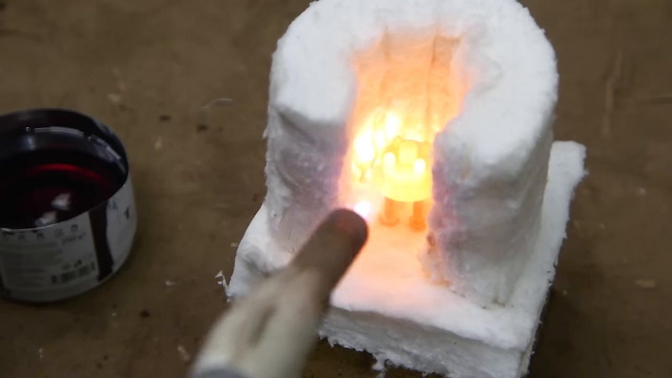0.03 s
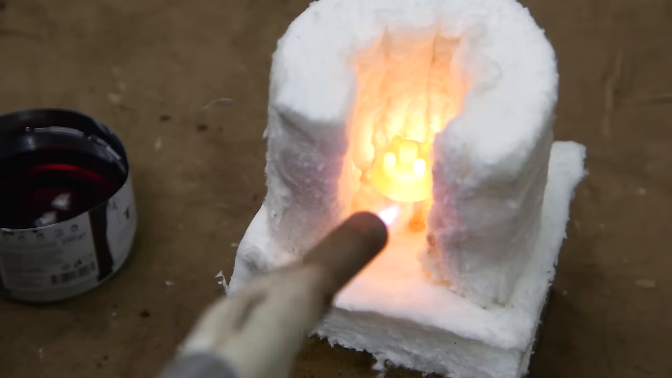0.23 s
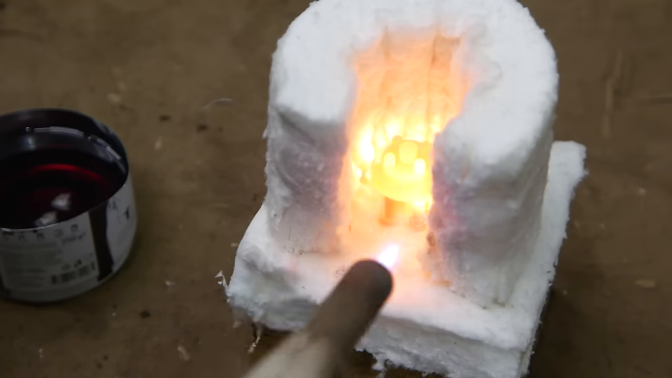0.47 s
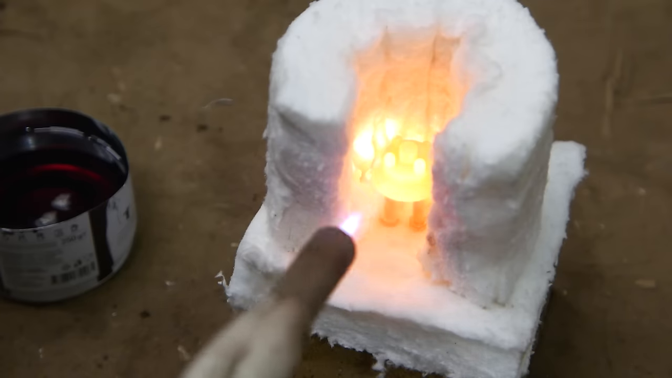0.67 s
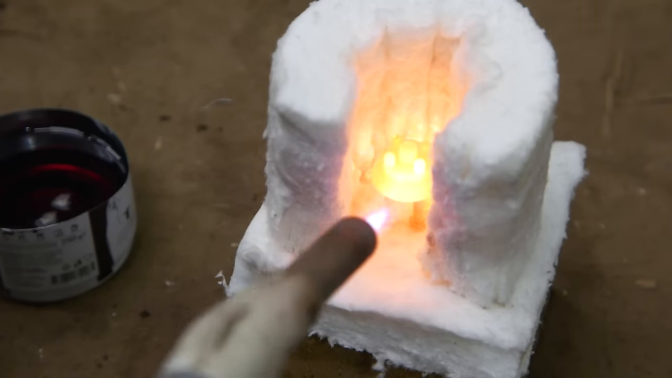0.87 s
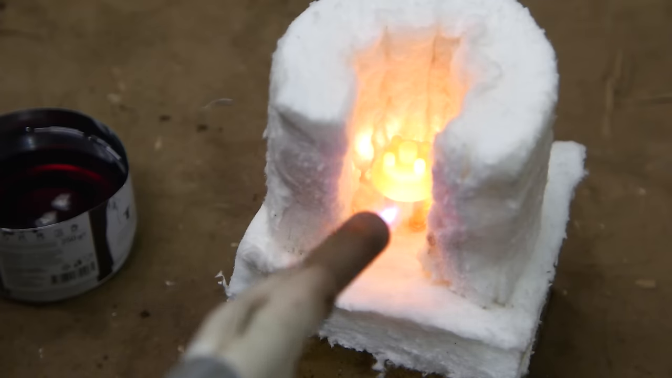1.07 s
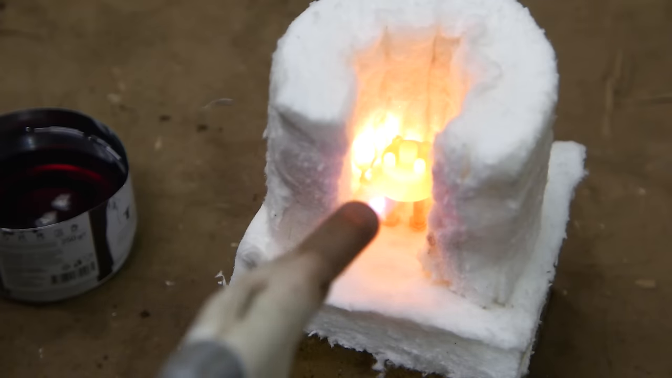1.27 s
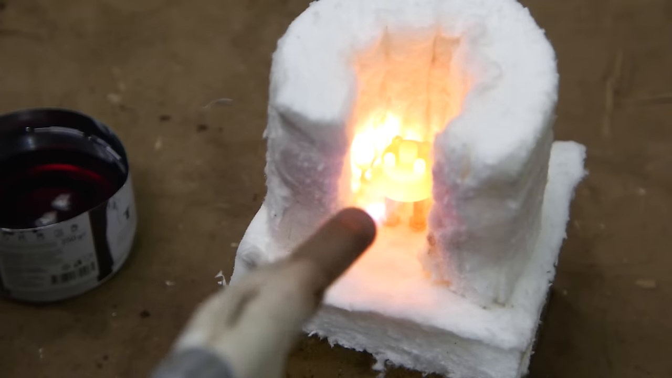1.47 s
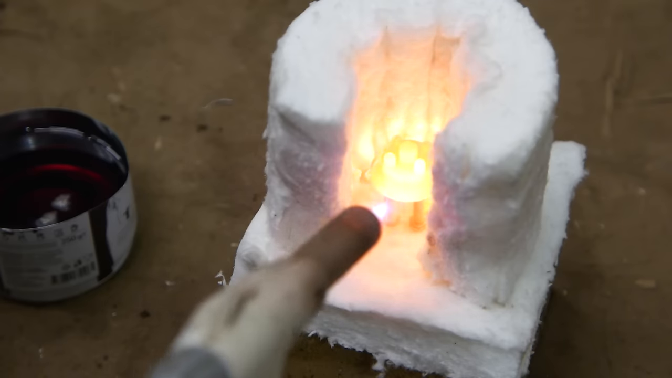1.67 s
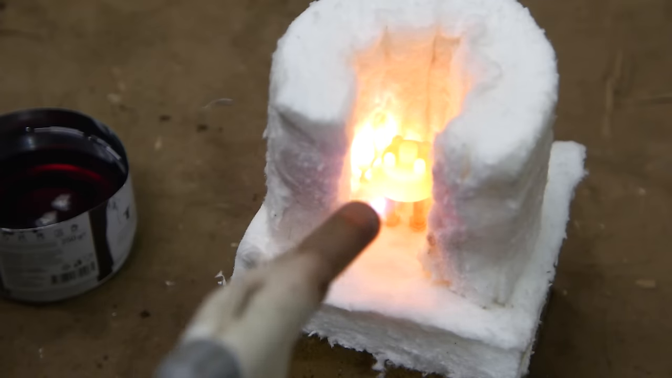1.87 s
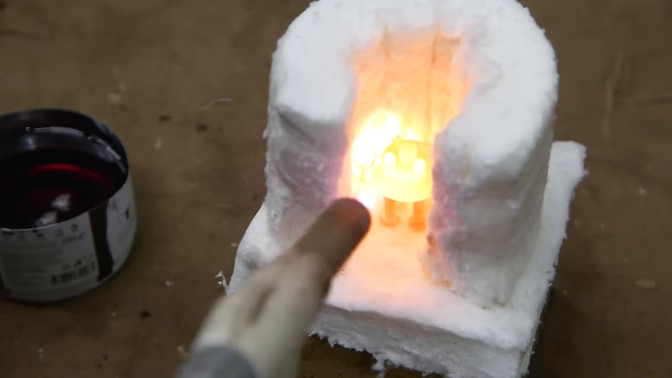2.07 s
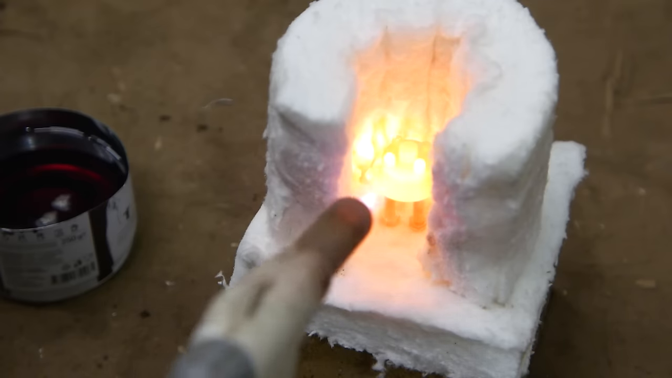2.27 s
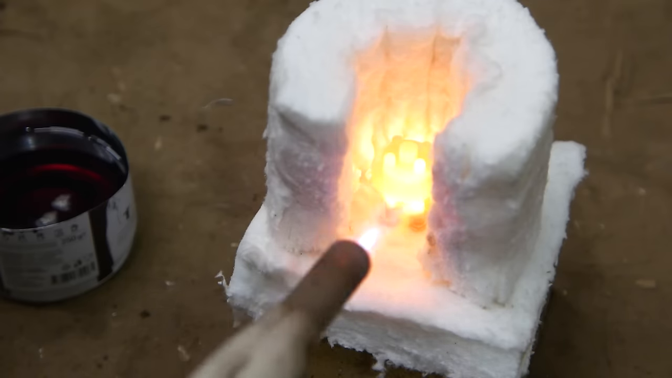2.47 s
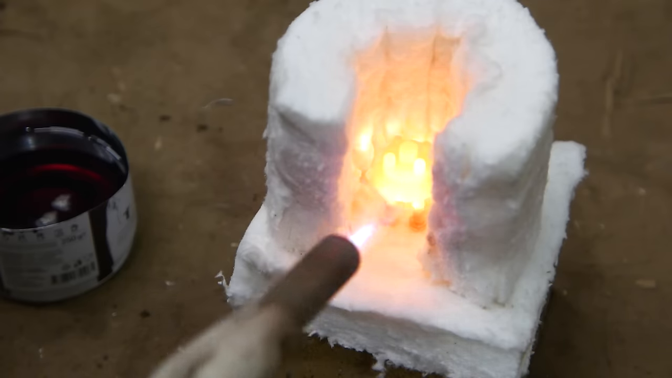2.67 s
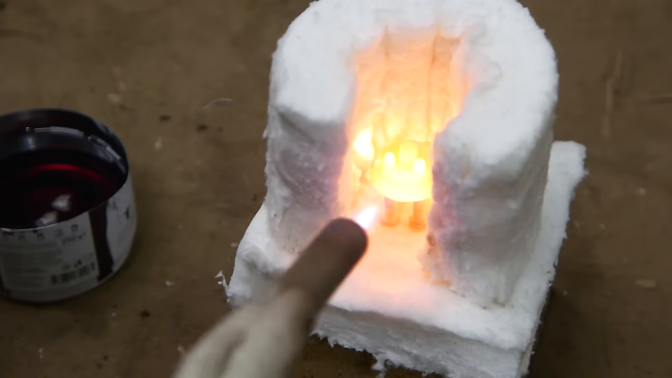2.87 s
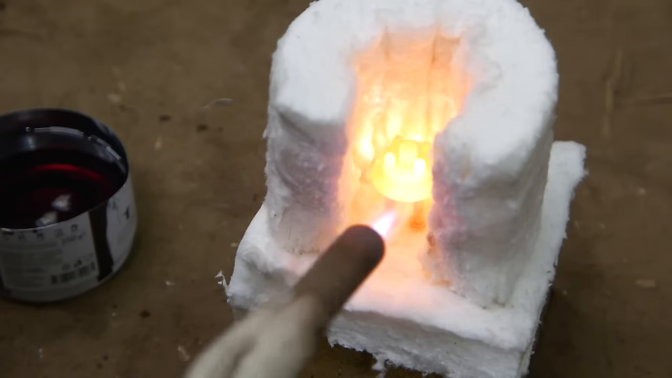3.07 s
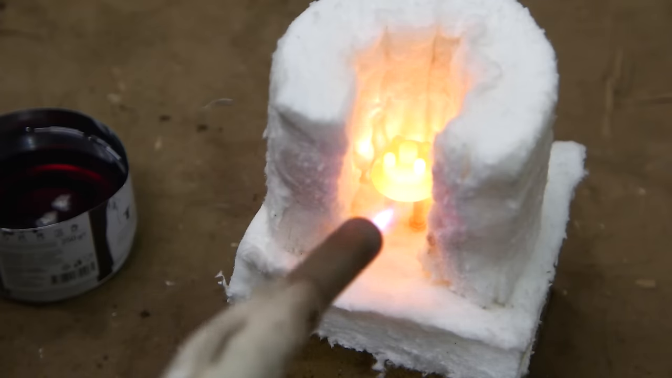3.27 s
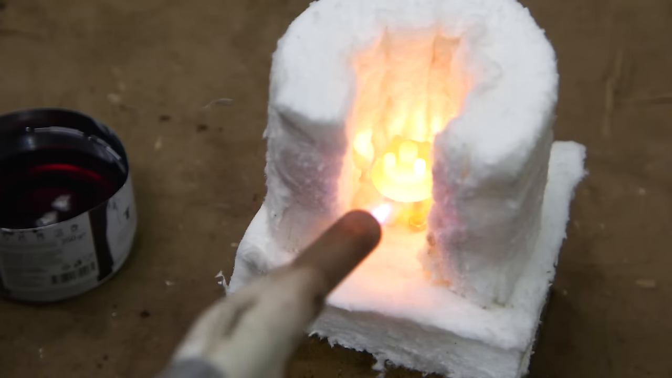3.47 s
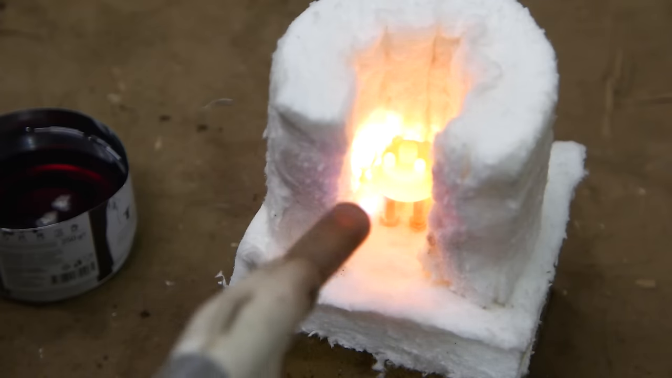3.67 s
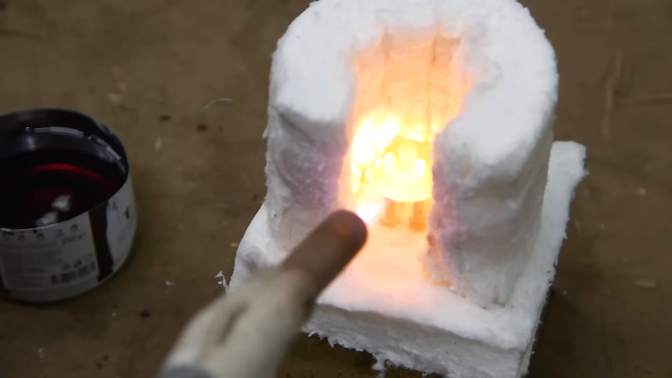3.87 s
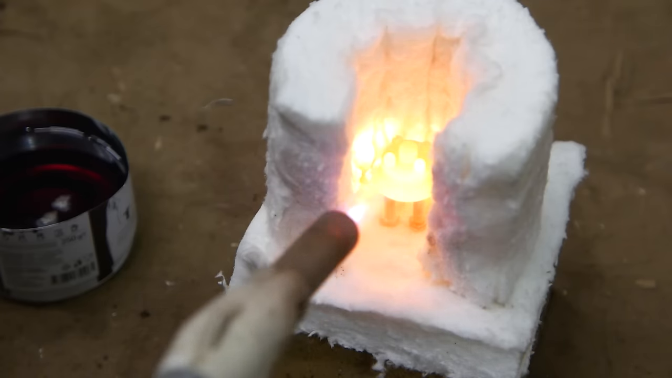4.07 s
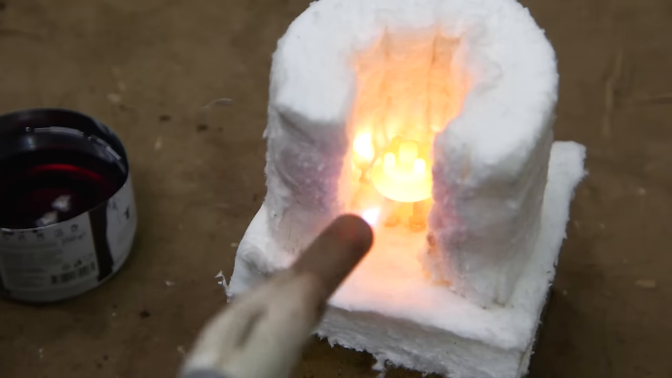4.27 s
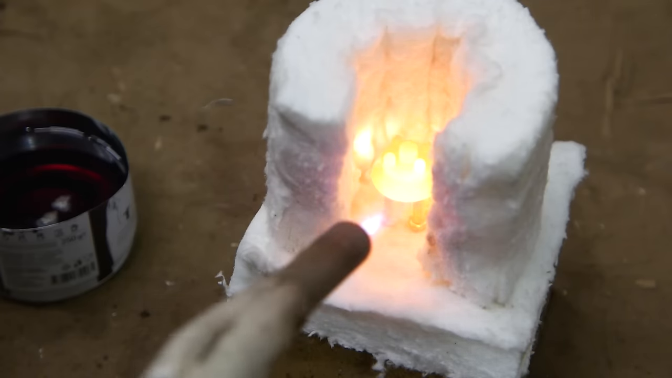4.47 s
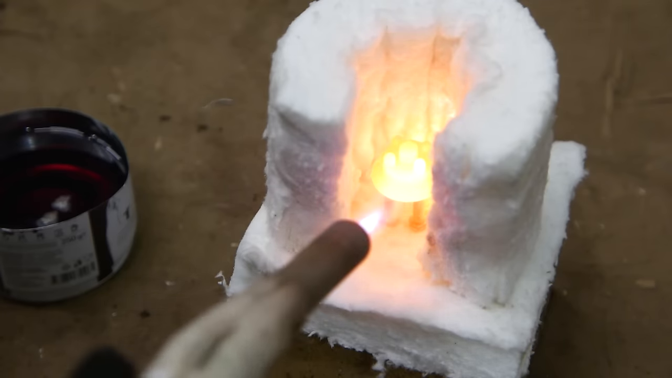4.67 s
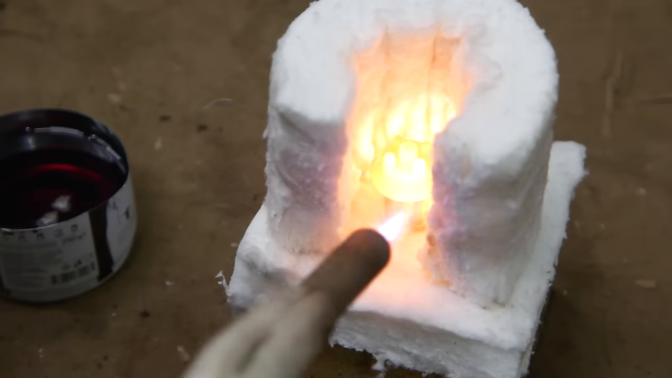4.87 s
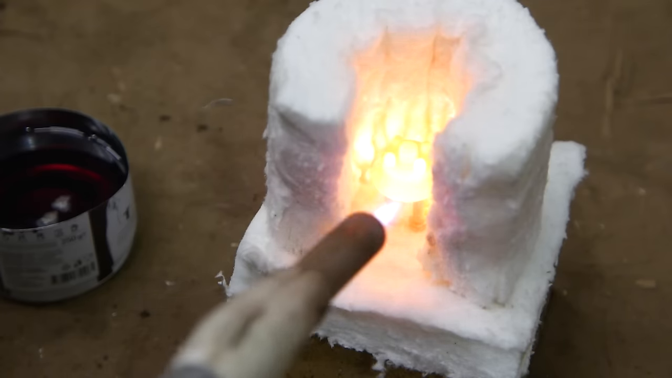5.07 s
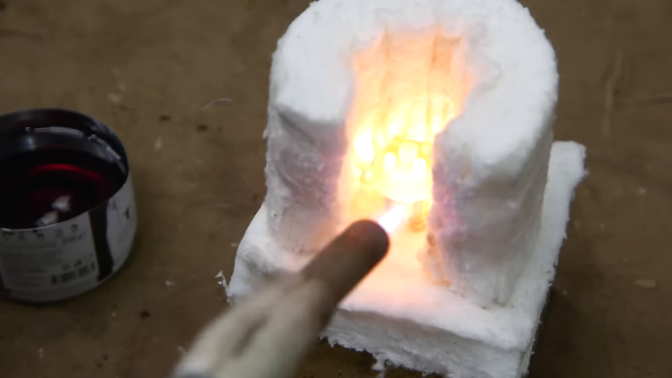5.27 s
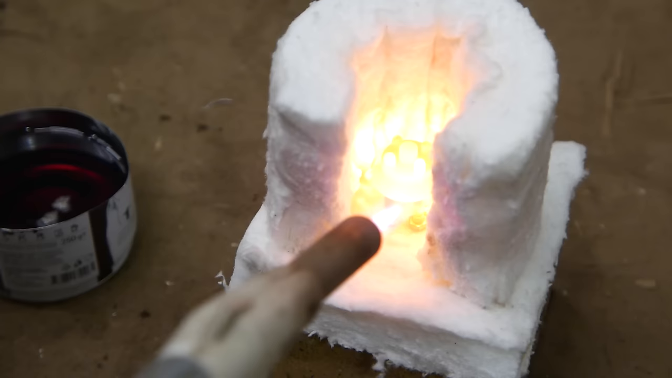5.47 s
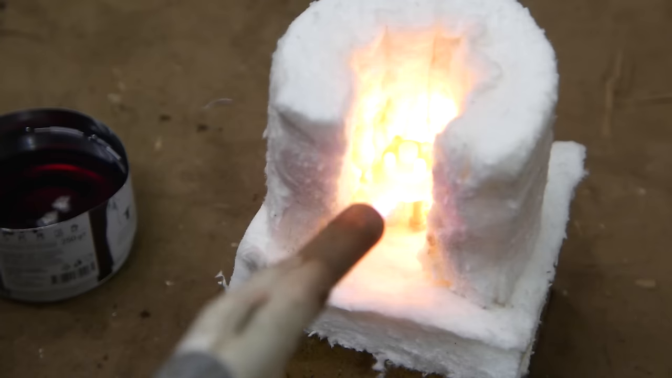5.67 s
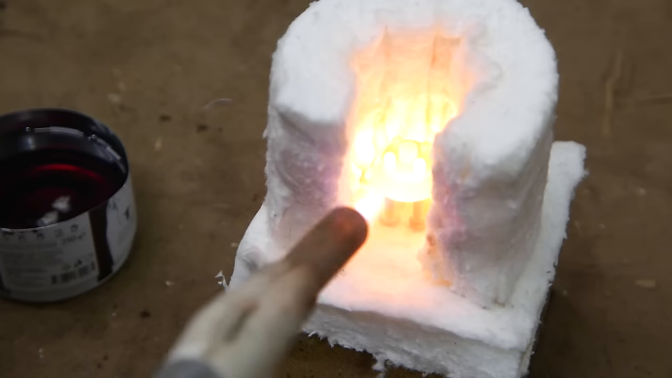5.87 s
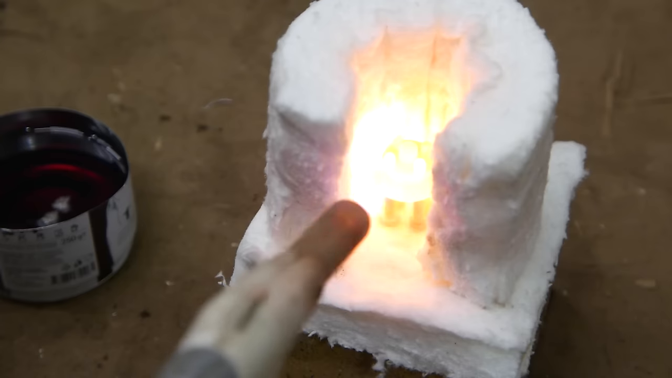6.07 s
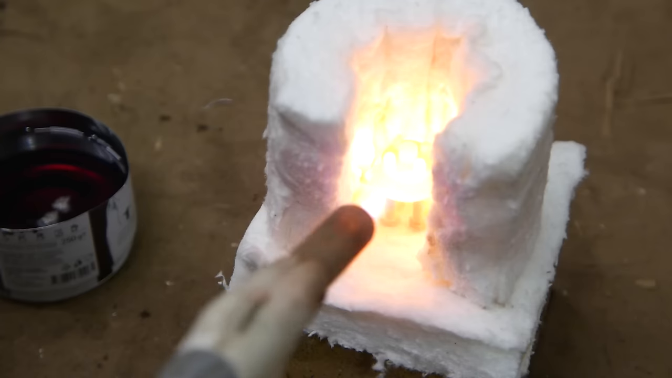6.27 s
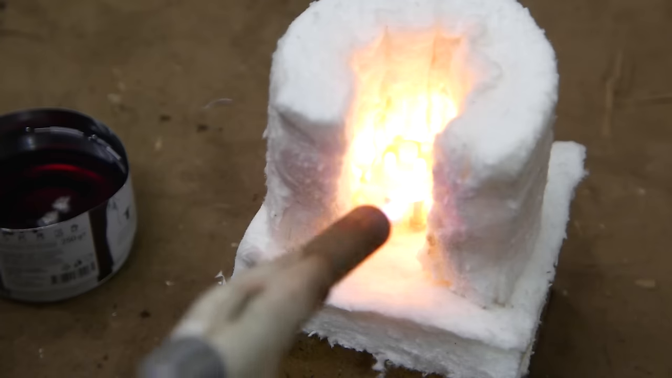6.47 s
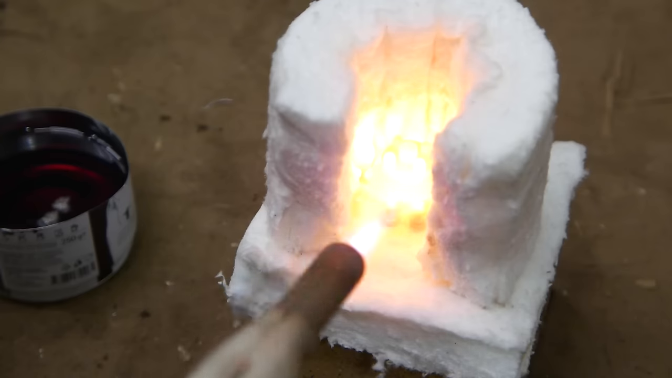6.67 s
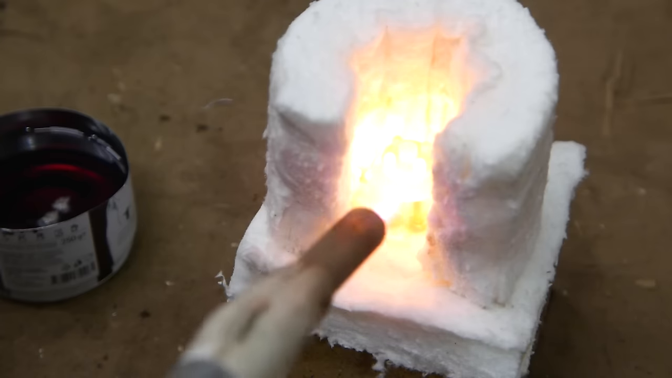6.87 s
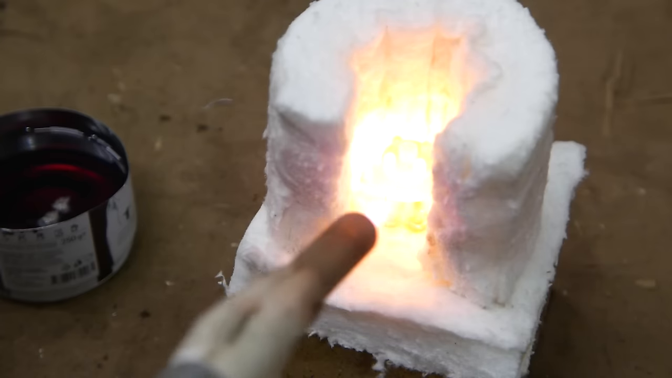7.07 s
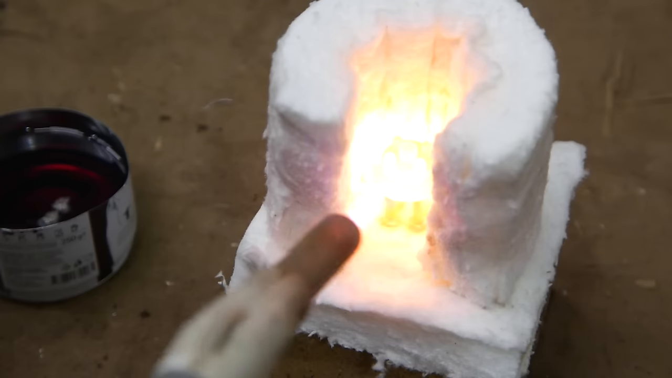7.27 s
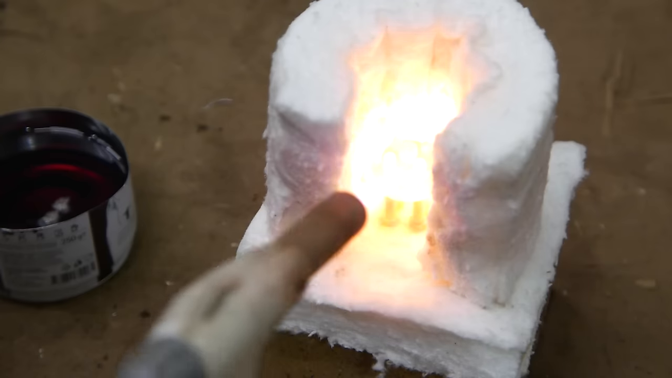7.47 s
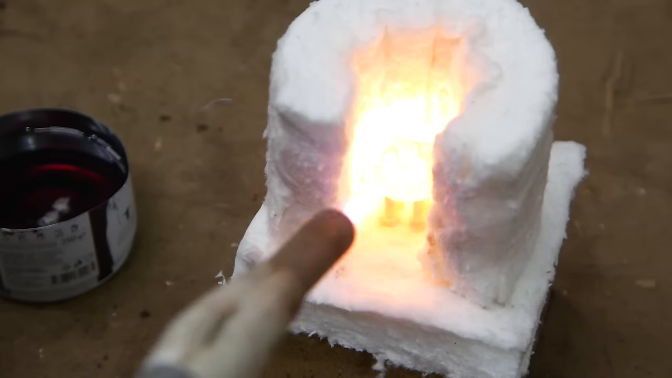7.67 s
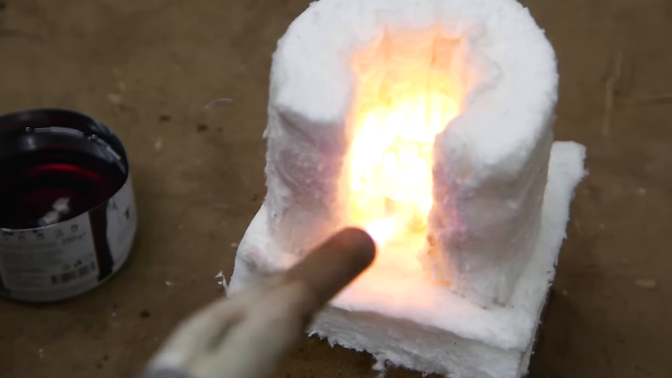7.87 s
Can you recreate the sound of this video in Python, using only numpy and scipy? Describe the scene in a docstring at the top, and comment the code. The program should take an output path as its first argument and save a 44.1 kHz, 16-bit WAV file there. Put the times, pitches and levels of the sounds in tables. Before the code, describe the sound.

Close, dry sound of a burning gas jet, already running at the start and never stopping. Sharp hissing air dominates, coloured by hollow, slightly whistly tube resonances, with tiny faint crackles buried in the flame. It sags almost imperceptibly, then surges within a moment past the middle, with stronger roar and hiss to the end. The workshop behind is very quiet, with only faint low noise.

```python
"""A handheld gas torch blows into a small fibre-lined furnace on a workshop bench; a little past halfway
the gas is turned up. Noise bands make the flame roar, the gas hiss and an airy top, all coloured by the
fixed resonances and notches of the burner tube. A broad hollow in the hiss slides as the hand aims the
torch, faint crackles ride in the flame, and a faint low noise lies underneath."""
import sys
import numpy as np
from scipy import signal
from scipy.fft import rfft, irfft
from scipy.io import wavfile

SR = 44100
rng = np.random.default_rng(int(sys.argv[2]) if len(sys.argv) > 2 else 0)


def transcribe(u):
    """Save the signal u as a 16-bit wav file named by the first command-line argument.

    u: samples, shape (n,) or (channels, n), limited to [-1, 1]; the rate is SR.
    q: integer samples, one column per channel.
    """
    v = np.clip(np.atleast_2d(u).T, -1, 1)
    q = np.round(v * 32767).astype(np.int16)
    wavfile.write(sys.argv[1], SR, q)


N = 350154
TIME = np.arange(N) / SR
FREQ = np.maximum(np.fft.rfftfreq(N, 1 / SR), 1)
LEFT_RIGHT = np.array([[1], [-1]])  # sign of the side signal in each channel
TOP_HZ = 15740  # upper edge of the sound

# aim of the nozzle, as the centre of the null in the jet's beam: t/s, f/Hz
NOZZLE_AIM = [(0.25, 11200), (0.63, 11900), (0.98, 10950), (1.3, 11660), (2.38, 11200), (2.58, 12600),
              (3.05, 11600), (3.42, 11850), (3.6, 12850), (3.9, 11400), (4.37, 11900), (4.8, 10600),
              (5.0, 11300), (6.04, 11800), (6.55, 11040), (6.97, 12140), (7.65, 10800), (7.94, 11100)]
NULL_DB, NULL_WIDTH_HZ = -10, 3350  # depth and width of that null


def undb(db):
    """Decibels to gain."""
    return 10 ** (np.asarray(db) / 20)


def unit(x):
    """Scale to rms 1."""
    return x / np.sqrt(np.mean(x ** 2))


def shape(x, gain):
    """Filter with one gain for each frequency."""
    return irfft(rfft(x) * gain, N)


def colour(points):
    """Gain for each frequency from (f/Hz, level/dB) points, joined along a log frequency axis."""
    hz, db = np.transpose(points)
    return undb(np.interp(np.log(FREQ), np.log(hz), db))


def below(hz, order):
    """Gain of a low-pass."""
    return 1 / np.sqrt(1 + (FREQ / hz) ** (2 * order))


def bell(freq, hz, width):
    """Shape of a resonance: 1 at hz, half at width / 2 either side."""
    return 1 / (1 + (2 * (freq - hz) / width) ** 2)


def walk(rate_hz):
    """Smooth random wander with spread 1: noise kept mostly below rate_hz."""
    return unit(shape(rng.standard_normal(N), below(rate_hz, order=2)))


def torch(roar_flutter_db, hiss_flutter_db, sway_db, deepen):
    """Turbulence sounds through the tube; more gas makes the roar louder and deeper."""
    # broad colour of the burning jet, relative within each band: f/Hz, level/dB
    jet_colour = [(200, -69), (400, -56), (600, -34.5), (900, -21.5), (1400, -5), (2400, -5), (3300, -8),
                  (5000, -4), (6000, -2), (8000, -2.5), (9800, -7.5), (11000, -12), (12800, -12.5),
                  (15700, -11)]
    # borders between deep roar, roar, hiss and the airy top: f/Hz
    band_borders = [900, 3130, 12500]
    hiss_start_db, roar_start_db = -38.65, -45
    roar_per_flow = 1.23  # dB of roar for each dB of gas flow

    flow_db = gas_flow()
    eddies = rng.standard_normal(N) + crackles(per_second=9, size_db=13, scatter_db=2)
    jet = at_both_sides(eddies, echo_db=-4.0) * colour(jet_colour) * burner_tube() * (FREQ < TOP_HZ)

    band = np.searchsorted(band_borders, FREQ)
    deep, roar, hiss, air = (irfft(jet * (band == k), N) for k in range(len(band_borders) + 1))
    flame = unit(roar + deep * undb(deepen * flow_db))
    gas = unit(aimed(hiss))
    top = airy_top(air, lift_db=0.8, flutter_db=0.6)

    # flame and gas stream each flutter on their own; the hiss also sways slowly with the hand
    roar_db = roar_start_db + roar_per_flow * flow_db + roar_flutter_db * walk(25)
    hiss_db = hiss_start_db + flow_db + hiss_flutter_db * walk(16) + sway_db * walk(4)
    return flame * undb(roar_db) + gas * undb(hiss_db) + top


def gas_flow():
    """Gas flow in dB over its starting value: it sags slowly and rises quickly as the valve turns."""
    middle_s, turn_s, rise_db = 4.77, 0.099, 3
    sag_db_per_s = 0.1257
    opened = np.clip((TIME - middle_s) / turn_s + .5, 0, 1)
    return rise_db * opened - sag_db_per_s * TIME


def crackles(per_second, size_db, scatter_db):
    """Sparse tiny pops of uneven size, barely above the turbulence."""
    chance = rng.random(N)
    unevenness = np.clip(rng.standard_normal(N), -2, 2)
    return (chance < per_second / SR) * undb(size_db + scatter_db * unevenness)


def burner_tube():
    """Gain of the tube: standing waves lift some bands and cancel others."""
    # resonances (+) and notches (-): f/Hz, width/Hz, level/dB
    tube_modes = [(760, 36, 4), (944, 67, 4.5), (1095, 100, 4), (1152, 75, -12), (1551, 32, 5),
                  (1870, 25, -8.5), (2044, 67, 6), (2342, 193, 8), (2450, 79, -2), (2755, 166, 8.5),
                  (2908, 50, -7), (3133, 92, -26), (3550, 91, -7.5), (3700, 54, 3), (3862, 40, -14),
                  (4080, 53, -19), (4297, 230, 4.5), (4405, 45, -21.5), (4640, 76, -12.5), (5270, 67, -2),
                  (5477, 121, -14.5), (5620, 310, 7.5), (6510, 156, 4.5), (8870, 92, -2), (9960, 117, 5),
                  (10160, 120, -6.5), (10270, 114, 9.5), (12070, 181, 8.5), (12723, 131, 10),
                  (15124, 70, 3)]
    return undb(sum(db * bell(FREQ, hz, width) for hz, width, db in tube_modes))


def aimed(hiss):
    """The treble leaves the nozzle as a beam; its null slides in frequency as the torch turns."""
    freq, t, frames = signal.stft(hiss, SR, nperseg=512)
    null_hz = np.interp(t, *np.transpose(NOZZLE_AIM))
    null_gain = undb(NULL_DB * bell(freq[:, None], null_hz, NULL_WIDTH_HZ))
    return signal.istft(frames * null_gain, SR)[1][:, :N]


def airy_top(air, lift_db, flutter_db):
    """The highest hiss, on the upper slope of the null at its average aim; it swells, fades and flutters."""
    # course of the airy top before lift_db is added: t/s, level/dB
    air_course = [(0.0, -54), (0.99, -52), (1.39, -55), (2.7, -55), (3.16, -51), (3.65, -57), (3.91, -52),
                  (4.38, -54), (4.95, -50.5), (5.48, -50), (5.68, -54), (5.88, -49), (5.93, -53),
                  (6.57, -52), (6.74, -48), (6.9, -53), (7.28, -50), (7.94, -50)]
    mean_null_hz = np.mean(NOZZLE_AIM, axis=0)[1]
    slope = undb(NULL_DB * bell(FREQ, mean_null_hz, NULL_WIDTH_HZ))
    course_db = np.interp(TIME, *np.transpose(air_course))
    return unit(shape(air, slope)) * undb(course_db + lift_db + flutter_db * walk(12))


def at_both_sides(source, echo_db):
    """Left and right spectra: echoes ripple the treble, and a little of the room differs between sides."""
    # gain of the side signal, the part that differs left and right: f/Hz, level/dB
    side_gain = [(500, -36), (2400, -50), (3500, -32), (4800, -22), (8000, -17.2), (15000, -15.2)]
    # tilt between the channels: f/Hz, left minus right level/dB
    left_tilt = [(3500, 0), (5000, .4), (8000, 1.1), (10000, .3), (13000, -1.2)]
    sound = rfft(source)
    treble = FREQ / (FREQ + 12000)  # echoes grow towards the top
    mid = sound * (1 + undb(echo_db) * treble * bench(decay_s=0.0095, count=40))
    side = rfft(rng.standard_normal(N)) + .7 * sound * bench(decay_s=.004, count=20)
    return (mid + LEFT_RIGHT * colour(side_gain) * side) * colour(left_tilt) ** (LEFT_RIGHT / 2)


def bench(decay_s, count):
    """Response of a few early echoes off the bench and things nearby, with mean power 1."""
    delay_s = rng.uniform(.001, .02, count)
    echoes = np.zeros(N)
    echoes[(delay_s * SR).astype(int)] = rng.standard_normal(count) * np.exp(-delay_s / decay_s)
    return rfft(echoes) / np.sqrt(np.sum(echoes ** 2))


def background(edge_hz, mid_db, follow, waver_db):
    """Faint low noise under the torch, partly different left and right; it follows the gas flow a little."""
    mid, side = (unit(shape(rng.standard_normal(N), below(edge_hz, order=3))) for _ in range(2))
    noise = mid + undb(-4.3) * side * LEFT_RIGHT
    return noise * undb(mid_db + follow * gas_flow() + waver_db * walk(13))


def scene():
    """The torch over the quiet workshop."""
    flame = torch(roar_flutter_db=0.5, hiss_flutter_db=0.4, sway_db=0.24, deepen=0.4)
    return flame + background(edge_hz=1050, mid_db=-82, follow=0.5, waver_db=1.0)


def record(dry):
    """A very steep low-pass ends the sound at TOP_HZ."""
    return shape(dry, below(TOP_HZ, order=200))


dry = scene()
out = record(dry)
transcribe(out)
```